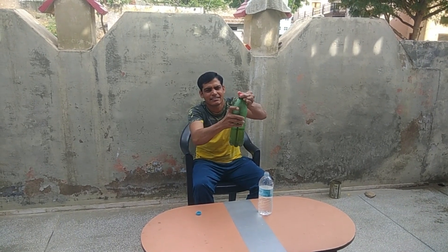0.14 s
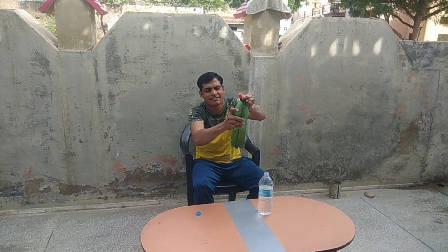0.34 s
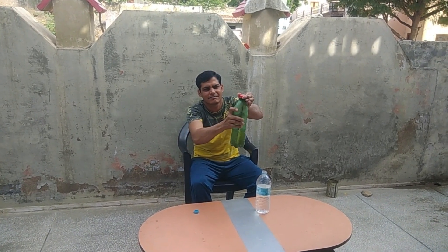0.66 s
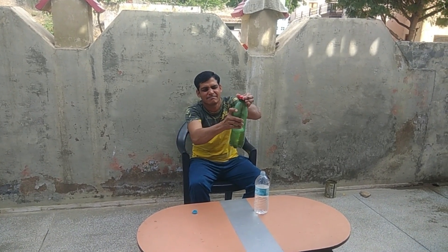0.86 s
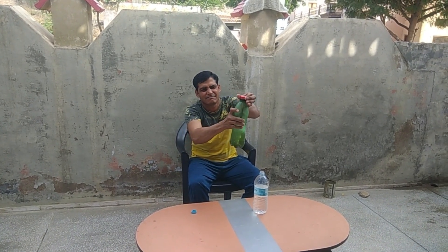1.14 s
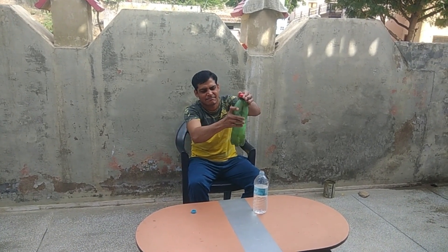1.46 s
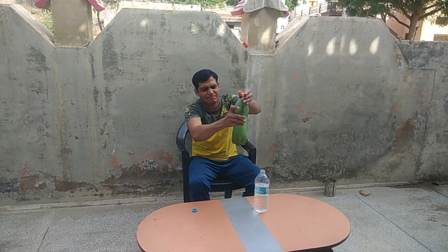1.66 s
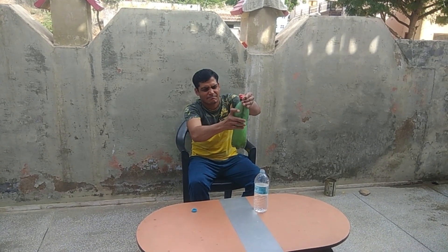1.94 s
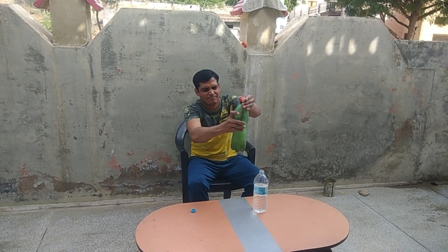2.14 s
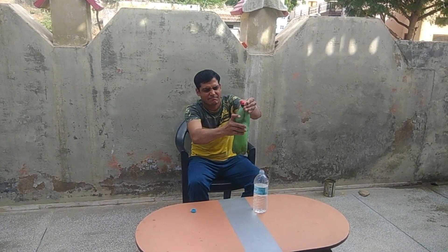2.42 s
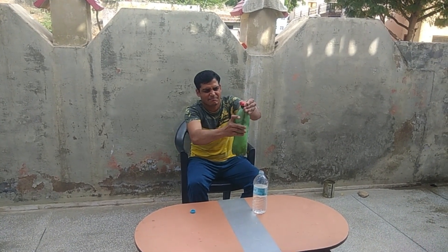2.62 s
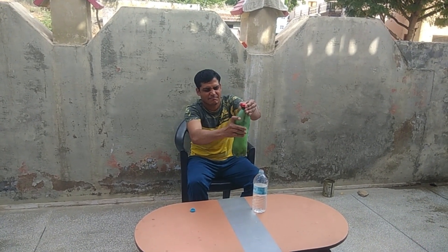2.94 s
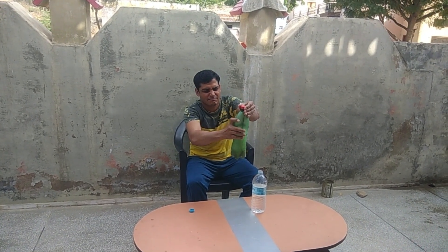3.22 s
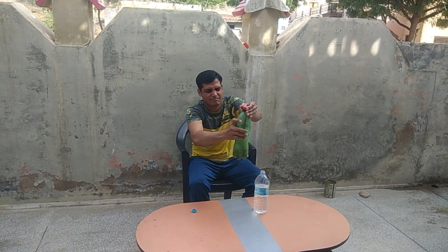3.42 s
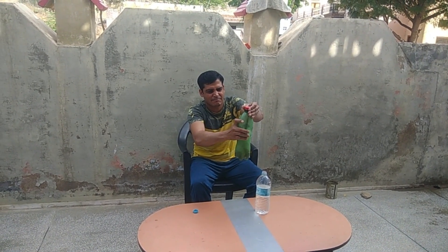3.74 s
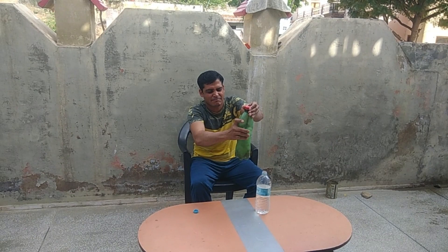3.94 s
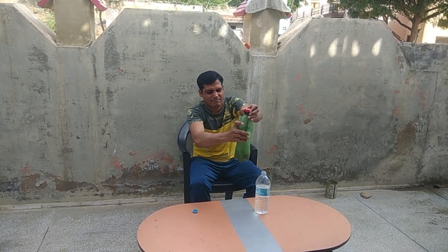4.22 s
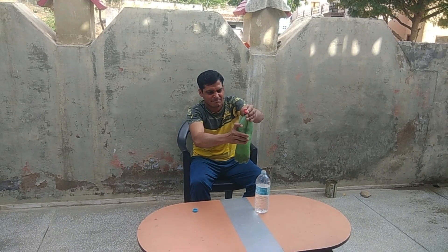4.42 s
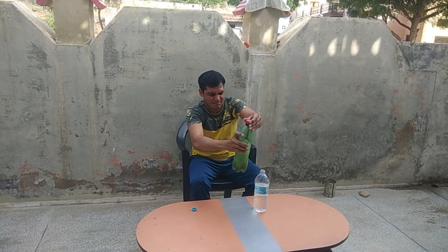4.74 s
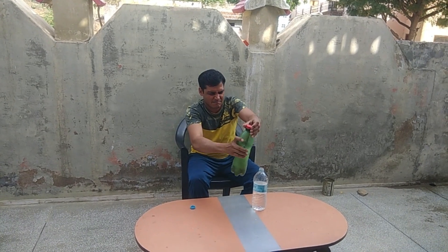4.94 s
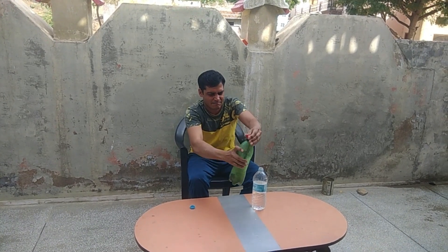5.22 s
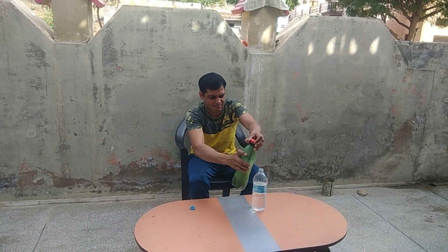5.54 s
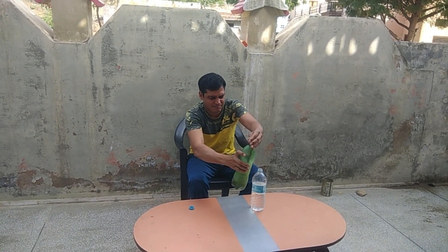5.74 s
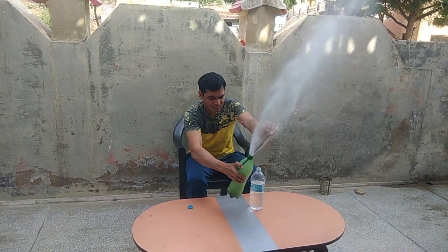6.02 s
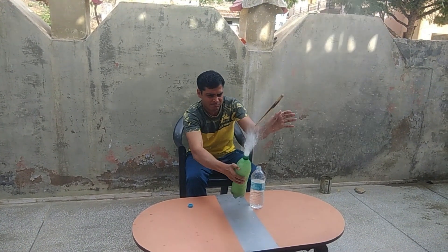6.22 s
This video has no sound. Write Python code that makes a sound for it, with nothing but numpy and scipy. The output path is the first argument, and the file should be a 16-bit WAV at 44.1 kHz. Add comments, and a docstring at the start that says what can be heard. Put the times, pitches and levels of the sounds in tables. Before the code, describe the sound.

Gas hisses loudly from a plastic bottle's loosened cap, then the cap blows off with a brief gush of water and foam.

```python
"""In a walled concrete yard, gas hisses out under the loosened cap of a plastic bottle. The thin jet
flutters, eddies swirl at its edge, the air in the neck rings, and the cap ticks once. Then the cap blows
off: the last gas barks out, and water and foam gush after it with thumps, pops and spray.
The walls scatter the sound. A low hum sounds twice near the start, over the noise of a far town."""
import sys
import numpy as np
from scipy import signal
from scipy.fft import rfft, irfft, next_fast_len
from scipy.io import wavfile
from scipy.ndimage import uniform_filter1d, map_coordinates

SR = 44100
rng = np.random.default_rng(int(sys.argv[2]) if len(sys.argv) > 2 else 0)


def bounce(signal):
    """Save signal as a 16-bit WAV file at the path given by the first command-line argument."""
    frames = np.transpose(np.atleast_2d(signal))
    limited = np.clip(frames, -1, 1)
    pcm = np.round(limited * 32767).astype(np.int16)
    wavfile.write(sys.argv[1], SR, pcm)


N = 280740
TIME = np.arange(N) / SR
CAP_OFF_S = 5.85

# How the leak changes: t/s, jet level/dB, lift of the jet's highest hiss/dB, eddy level/dB
LEAK_LEVELS = [(.36, -14, 6.5, -24), (.45, -13, 7.5, -27), (.6, -12.5, 5.5, -31), (1.05, -13, 7.5, -32.5),
               (1.25, -12, 7.5, -34.5), (1.38, -14, 7.5, -35.5), (1.6, -12, 6.5, -33),
               (1.73, -15.5, 4, -30.5), (1.86, -13, 5.5, -29), (2.12, -14, 5.5, -28.5),
               (2.35, -12.5, 6, -29), (2.8, -13.5, 8.5, -31), (2.95, -12, 7, -31), (3.15, -12.5, 5.5, -31),
               (3.4, -12, 6, -29.5), (3.72, -11.5, 5, -29.5), (3.95, -13, 7, -33), (4.35, -13.5, 7, -32.5),
               (4.55, -13, 8.5, -27), (4.7, -11.5, 6, -32), (5.2, -14.5, 8.5, -33.5),
               (5.29, -12.5, 7, -28.5), (5.65, -15, 9.5, -34.5), (5.75, -15, 9.5, -26.5),
               (5.85, -13, 6.5, -32)]


def leak():
    """The gap under the cap opens and shifts, so the hiss and the sounds under it flutter together."""
    # Brief dips in the hiss: t/s, depth/dB
    dips = [(2.05, 1), (3.82, 2), (4.34, 1), (4.76, 1)]
    opening_db = -71 * np.exp(-(TIME - 0.24) / 0.032)
    dip = amp(-sum(db * np.exp(-((TIME - s) / 0.032) ** 2) for s, db in dips))
    flutter = amp(opening_db + 0.6 * wobble(18) + 0.031 * wobble(170))
    hiss = dip * jet()
    lower_sounds = dip * eddies() + neck() + distortion_rumble()
    cap_on = 1 - ramp(CAP_OFF_S, 0.1)
    return flutter * (hiss + cap_on * lower_sounds)


def jet():
    """Gas squeezes through the cap's thread in a high hiss that dies when the cap flies off."""
    # Tone of the jet: f/Hz, level/dB
    spectrum = [(3500, -48), (5500, -47), (7000, -9), (7800, -3.5), (8500, 0), (9600, -2.5), (10400, 0.5),
                (11000, 3.5), (11600, 4), (12300, -2.5), (12900, -8.5), (13400, -10), (14300, -8.5),
                (15000, -12), (15700, -9)]
    jet_db, lift_db, _ = curves(LEAK_LEVELS)
    hiss = in_yard(patchy(depth=0.33, size=(2, 8)), spectrum)
    fall_db = 184 * np.maximum(TIME - CAP_OFF_S, 0)
    # The highest hiss forms a beam that swings with the bottle.
    return amp(jet_db - fall_db) * lift_treble(hiss, 12390, lift_db + 0.37 * wobble(9.8))


def eddies():
    """Slower swirls at the edge of the jet make a lower, sputtering hiss."""
    # Tone of the swirls: f/Hz, level/dB
    spectrum = [(1590, -42.5), (2700, -16.5), (3060, -9.5), (3480, -14), (3800, -9.5), (4400, -4.5),
                (4900, -5), (5300, -9), (6300, -7), (7000, -6.5), (9100, -12), (15400, -120)]
    # Extra treble: t/s, lift/dB
    treble = [(.3, 6), (.5, 12.5), (1.07, 14), (1.3, 9.5), (1.8, 7), (2.3, 7.5), (2.6, 6), (2.9, 8.5),
              (3.2, 10), (3.7, 7), (3.92, 14.5), (4.5, 7.5), (4.95, 13), (5.2, 7), (5.3, 11), (5.55, 14),
              (5.75, 0.5), (5.85, 12)]
    # Strong echo off the ground: left delay/ms, right delay/ms, level/dB
    ground = [(2.451, 2.45, 3)]
    _, _, eddy_db = curves(LEAK_LEVELS)
    lift_db = curves(treble)[0] + 1.6 * wobble(22)
    sputter = amp(eddy_db + 0.3 * wobble(16) + 0.5 * wobble(150))
    hiss = in_yard(patchy(depth=1.8, size=(2, 8)), spectrum)
    return sputter * lift_treble(unit(echoed(hiss, ground)), 5126, lift_db)


def neck():
    """The air in the bottle's neck rings as gas rushes past."""
    # Tone of that air: f/Hz, level/dB
    spectrum = [(530, -29), (900, -16), (1440, -6.5), (1650, -2), (1850, -2), (2050, -4.5), (2380, -0.5),
                (2630, -5.5), (3200, -25), (4160, -38), (7040, -120)]
    # Its loudness: t/s, level/dB
    levels = [(.4, -44.5), (.65, -46), (1.1, -41), (1.35, -45.5), (2, -42.5), (2.7, -42.5), (3.1, -46.5),
              (4, -43.5), (4.8, -47), (5.65, -44.5), (5.8, -42)]
    gain = amp(curves(levels)[0] + 0.18 * wobble(15))
    return gain * in_yard(patchy(depth=0.7, size=(1, 5)), spectrum)


def burst():
    """The freed neck dumps its last gas in one rough bark."""
    # Tone of the bark: f/Hz, level/dB
    spectrum = [(1000, -23), (1500, -2), (1900, 0), (2500, -7), (3600, -7), (4200, -4.5), (4700, 4),
                (5300, -5), (7000, -0.5), (9000, -20)]
    rise_s, hold_s, fade_s = 0.016, 0.029, 0.16
    fading_s = np.maximum(TIME - CAP_OFF_S - rise_s - hold_s, 0)
    bark = in_yard(amp(1.4 * wobble(200)) * rng.standard_normal((3, N)), spectrum)
    return amp(-21 - 60 * fading_s / fade_s) * ramp(CAP_OFF_S, rise_s) * bark


def gush():
    """Gulps of water thump out of the neck and foam pops, over the rush of the emptying bottle."""
    # Flow of water: t/s, level/dB
    flow = [(5.844, -20), (5.855, -9), (5.87, 0), (5.9, 2), (5.96, -2), (6.116, -3), (6.15, -10),
            (6.17, -14), (6.24, -17.5), (6.33, -23.5), (6.366, -32)]
    # Gulps leaving the neck: t/s, level/dB, f/Hz, time to fade by 60 dB/s
    thumps = [(5.866, -24, 320, 0.055), (5.9, -17, 260, 0.047), (5.92, -21, 267, 0.038),
              (5.979, -26, 290, 0.087), (6.045, -29, 232, 0.055), (6.255, -39, 173, 0.13)]
    # Bursting foam: t/s, level/dB, f/Hz, time to fade by 60 dB/s
    pops = [(5.866, -26, 4740, 0.033), (5.877, -18, 4590, 0.082), (5.891, -14, 1920, 0.018),
            (5.891, -19, 4530, 0.041), (5.923, -15, 1870, 0.02)]
    flow_db, start_s = curves(flow)[0], flow[0][0]
    gulps = wobble(76)
    water = glug(flow_db, gulps) + hollow(flow_db) + froth(flow_db, gulps) + spray()
    return rings(thumps) + rings(pops) + ramp(start_s, 0.015) * water


def glug(flow_db, gulps):
    """Water beats in the neck, louder the more of it flows."""
    # Tone of the beating water: f/Hz, level/dB
    spectrum = [(110, -40), (180, -10), (274, 1), (421, -6), (509, 2), (578, 0.5), (750, -0.5), (992, -3),
                (1300, -8.5), (1700, -22), (2640, -120)]
    beating = amp(0.38 * gulps) * patchy(depth=0.21, size=(2, 3))
    return amp(-35 + flow_db) * in_yard(beating, spectrum, near_db=8)


def hollow(flow_db):
    """The air space in the emptying bottle rumbles."""
    # Tone of the air space: f/Hz, level/dB
    spectrum = [(40, -39), (90, -6.5), (165, 8.5), (250, -3), (430, -1), (750, -14), (1000, -20.5)]
    return amp(-44.5 + 0.34 * flow_db) * in_yard(rng.standard_normal((3, N)), spectrum, near_db=16)


def froth(flow_db, gulps):
    """Foam crackles with the flow, loudest just as the cap flies."""
    # Tone of the foam: f/Hz, level/dB
    spectrum = [(500, -32), (800, -16), (1200, -6), (1500, -5), (1850, 0.5), (2250, -2.5), (2500, -3.5),
                (2750, -6), (3300, -5.5), (4500, -7.5), (5300, -4.5), (6500, -3), (8500, -29)]
    crackle = amp(0.33 * wobble(440) + 0.5 * gulps) * patchy(depth=0.97, size=(3, 3))
    blast_db = 9 * np.exp(-((TIME - 5.9) / 0.097) ** 2)
    return amp(-31.5 + 0.75 * flow_db + blast_db) * in_yard(crackle, spectrum, near_db=-8)


def spray():
    """Flying spray makes a bright hiss, heard mostly off the walls."""
    # Tone of the spray: f/Hz, level/dB
    spectrum = [(2060, -15), (3500, -15), (5880, -25), (7090, -3), (7230, -2.5), (11600, -1), (15600, -11)]
    # How it fades: t/s, relative level/dB
    levels = [(5.95, -41.5), (6.1, -40.5), (6.14, -43.5), (6.17, -48), (6.24, -51.5), (6.36, -51)]
    hiss = amp(0.79 * wobble(300)) * patchy(depth=0.3, size=(3, 4))
    return amp(8 + curves(levels)[0]) * in_yard(hiss, spectrum, near_db=-23)


def tick(at_s=1.2585, width_s=0.0001):
    """The cap ticks once: one short pulse of pressure."""
    return -amp(-24) * np.exp(-((TIME - at_s) / width_s) ** 2)


def hum():
    """A low, nearly pure hum swells and stops twice, a little to the right."""
    # The two hums: start t/s, release t/s, f/Hz, level/dB
    notes = [(0.404, 0.568, 167, -43), (.63, 0.683, 166.5, -52)]
    total = np.zeros(N)
    for start_s, release_s, hz, db in notes:
        swell = ramp(start_s, 0.046) * (1 - ramp(release_s, 0.018))
        phase = 2 * np.pi * hz * TIME
        total += np.sqrt(2) * amp(db) * swell * (np.sin(phase) + amp(-23) * np.sin(2 * phase))
    return total * amp([[-0.4], [0.4]])


def distortion_rumble():
    """A faint, low, broad rumble of recorder distortion lies under the loud hiss."""
    # Tone of the rumble: f/Hz, level/dB
    spectrum = [(12, -29), (25, -8.5), (80, -3), (168, -6), (484, -2.5), (1010, 1), (1100, -4), (1430, -2),
                (2420, -120)]
    gain = ramp(0.36, 0.02) * amp(-53.5 + 0.8 * wobble(8))
    return gain * in_yard(patchy(depth=0.3, size=(2, 6)), spectrum)


def town():
    """The low noise of a far town drifts into the yard."""
    # Tone of the town: f/Hz, level/dB
    spectrum = [(40, -44), (70, -29), (100, -12), (135, -0.5), (178, 1), (250, -1.5), (320, -2.5), (420, 0),
                (530, -9), (700, -1), (1000, -21.5), (1300, -13.5), (2350, -21), (2480, -10), (2600, -24),
                (2900, -42), (5200, -24), (5800, -40), (7500, -38), (8500, -25), (11800, -37), (15000, -32)]
    # Its loudness: t/s, level/dB
    levels = [(0, -51.5), (.1, -54), (.2, -59.5), (.3, -54), (1, -56), (1.5, -56.5), (5.8, -59.5),
              (6.2, -57)]
    gain = amp(curves(levels)[0] + 0.36 * wobble(3.6))
    return gain * in_yard(patchy(depth=0.46, size=(2, 6)), spectrum, near_db=-3.5)


def in_yard(noises, spectrum, near_db=0):
    """Three noises become stereo at rms 1: one arrives directly, two scatter off the walls."""
    # Direct sound over scattered sound: f/Hz, level/dB
    directness = [(100, -4.5), (1500, 1.5), (3300, -8.5), (4400, 5.5), (5500, -15.5), (7100, -2),
                  (9300, -1.5), (11500, 5.5), (12400, 0.5), (15000, -0.5)]
    # Left side over right side: f/Hz, level/dB
    balance = [(60, 0), (180, -1.5), (550, -1), (1650, 0.5), (4970, -1), (15000, -1)]
    lag_s = np.array([[0.3], [-0.3]]) / SR  # the bottle stands slightly to the right
    direct = lambda f: amp(along(directness, f) + near_db)
    side = lambda f: amp(along(balance, f) * np.array([[0.5], [-0.5]]))
    colour = lambda f: amp(along(spectrum, f)) * side(f) / np.sqrt(1 + direct(f) ** 2)
    straight = filtered(noises[0], lambda f: colour(f) * direct(f) * np.exp(-2j * np.pi * f * lag_s))
    return unit(straight + filtered(noises[1:], colour))


def patchy(depth, size):
    """Three noises with narrow, drifting peaks and dips that give a faintly watery, whistly texture."""
    spectra = signal.stft(rng.standard_normal((3, N)), nperseg=1024)[2]
    speckle = rng.standard_normal((2, *spectra.shape[1:]))
    bins, frames = size  # width of a patch in frequency and in time
    real, imag = uniform_filter1d(uniform_filter1d(speckle, bins, axis=1), frames, axis=2)
    pattern = np.abs(1 + depth * (unit(real) + 1j * unit(imag)))
    band_power = np.abs(uniform_filter1d(pattern ** 2, size=14, axis=0))
    pattern /= np.sqrt(band_power + 1e-9)  # broad bands keep their level
    return signal.istft(spectra * pattern, nperseg=1024)[1][:, :N]


def echoed(x, echoes):
    """Nearby surfaces add late copies whose delays sway as the bottle moves."""
    total = x
    for *delays_ms, db in echoes:
        sway_ms = 0.04 * wobble(1.5)
        late = [map_coordinates(channel, [np.arange(N) - (ms + sway_ms) * SR / 1000])
                for channel, ms in zip(x, delays_ms)]
        total = total + amp(db) * np.array(late)
    return total


def rings(events):
    """Each event is a fading pure tone that takes about one cycle to start."""
    total, age = np.zeros(N + SR), np.arange(SR // 4) / SR
    for start_s, db, hz, fade_s in events:
        envelope = amp(db - 60 * age / fade_s) * (1 - np.exp(-age * hz))
        total[round(start_s * SR):][:len(age)] += envelope * np.sin(2 * np.pi * hz * age)
    return total[:N]


def lift_treble(x, edge_hz, db):
    """Raise everything above the edge by db."""
    treble = filtered(x, lambda hz: np.clip((hz - edge_hz) / 800 + 0.5, 0, 1))
    return x + (amp(db) - 1) * treble


def filtered(x, response):
    """Multiply each frequency in x by response(hz)."""
    size = next_fast_len(N + SR // 2)
    return irfft(rfft(x, size) * response(np.fft.rfftfreq(size, 1 / SR)), size)[..., :N]


def wobble(rate):
    """A smooth random curve through rate points a second."""
    return map_coordinates(rng.standard_normal(int(N * rate / SR) + 4), [TIME * rate])


def curves(rows):
    """One value per sample for each column after the time."""
    times, *columns = np.transpose(rows)
    return [np.interp(TIME, times, column) for column in columns]


def along(points, hz):
    """Read between (frequency, value) points on a log axis."""
    freqs, values = np.transpose(points)
    return np.interp(np.log(hz + 1), np.log(freqs + 1), values)


def ramp(start_s, length_s):
    """Rise in a straight line from 0 to 1."""
    return np.clip((TIME - start_s) / length_s, 0, 1)


def amp(db):
    """Turn decibels into a gain."""
    return 10 ** (np.asarray(db) / 20)


def unit(x):
    """Scale to an average strength (rms) of 1."""
    return x / np.sqrt(np.mean(x ** 2) + 1e-20)


def scene():
    """The leak, the burst and their close echoes, then the cap, the water and the background."""
    # Echoes off table, wall and hand: left delay/ms, right delay/ms, level/dB
    surfaces = [(1.78, 1.5, -15.5), (3.9, 3.44, -12), (0.614, 0.81, -23)]
    return echoed(leak() + burst(), surfaces) + tick() + gush() + hum() + town()


def record(dry):
    """Round off the highest peaks near full scale and cut the very highest treble."""
    ceiling, top_hz = 0.97, 15780
    clipped = dry / (1 + np.abs(dry / ceiling) ** 12) ** (1 / 12)
    return filtered(clipped, lambda hz: np.clip((top_hz - hz) / 40, 0, 1))


dry = scene()
out = record(dry)
bounce(out)
```